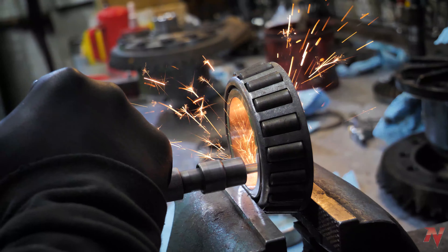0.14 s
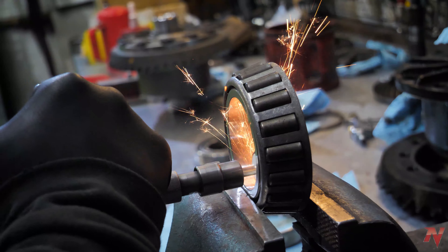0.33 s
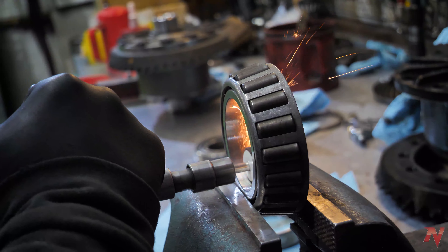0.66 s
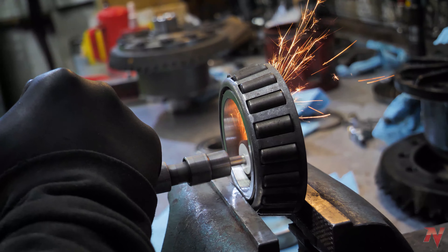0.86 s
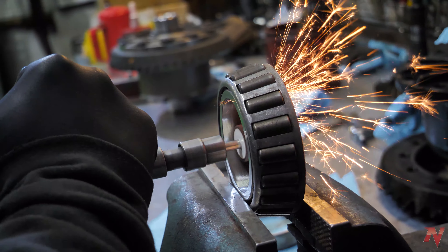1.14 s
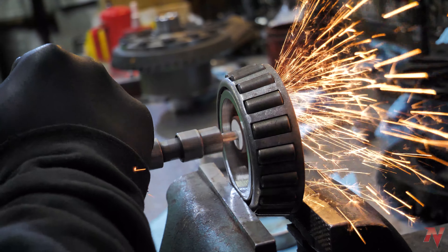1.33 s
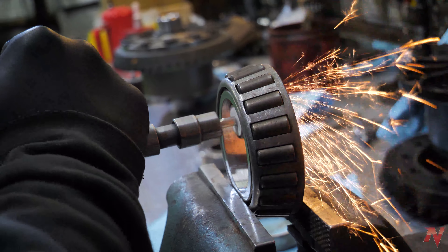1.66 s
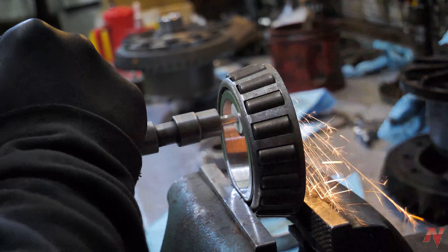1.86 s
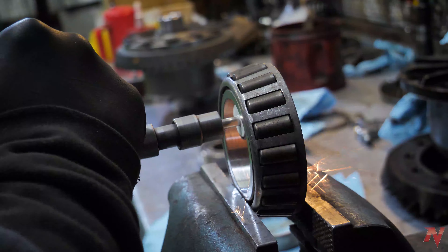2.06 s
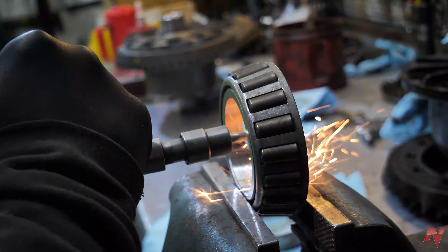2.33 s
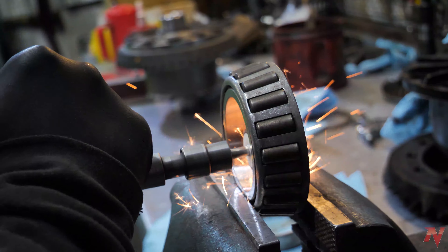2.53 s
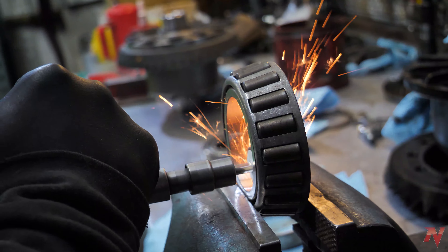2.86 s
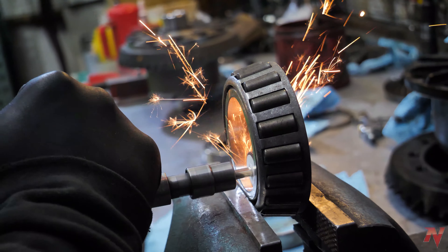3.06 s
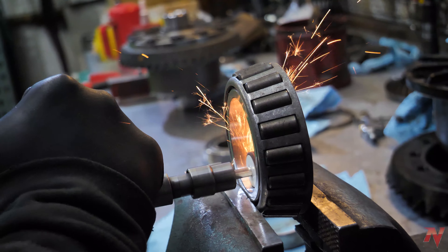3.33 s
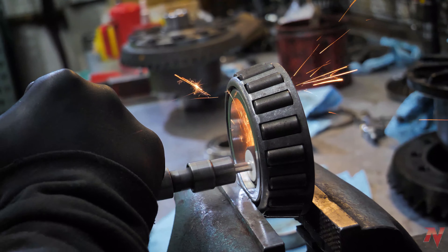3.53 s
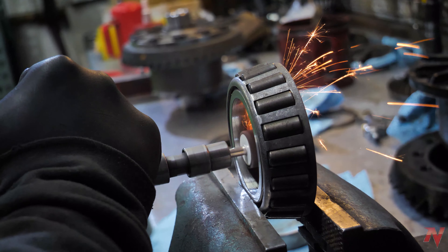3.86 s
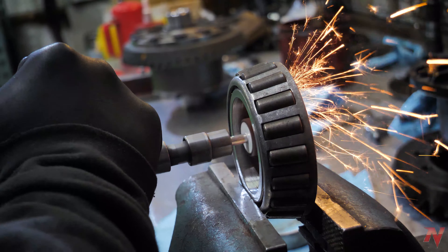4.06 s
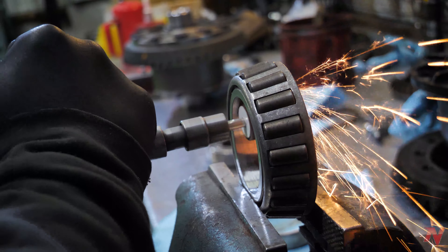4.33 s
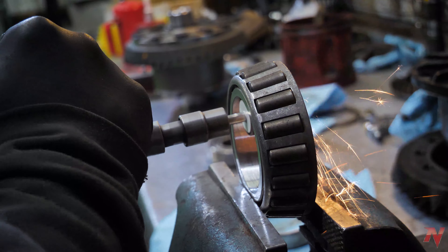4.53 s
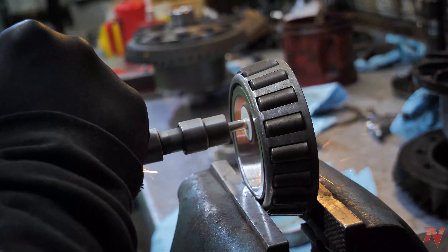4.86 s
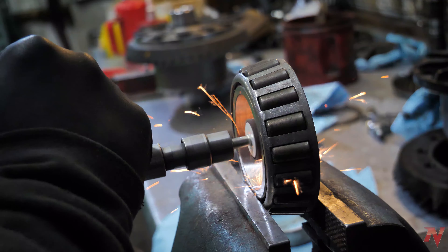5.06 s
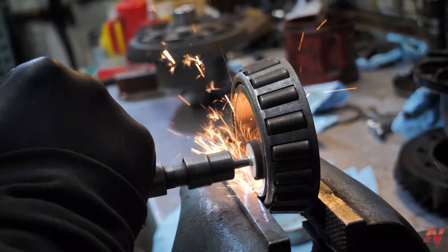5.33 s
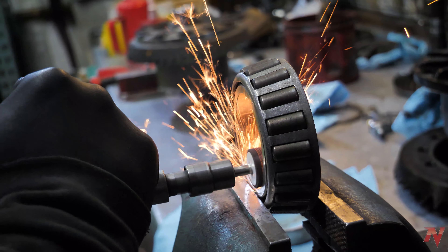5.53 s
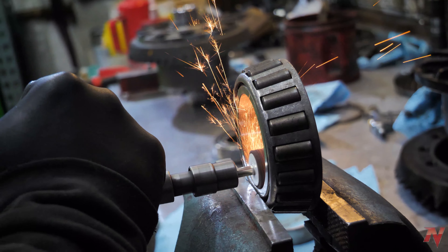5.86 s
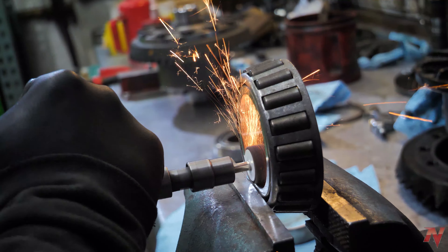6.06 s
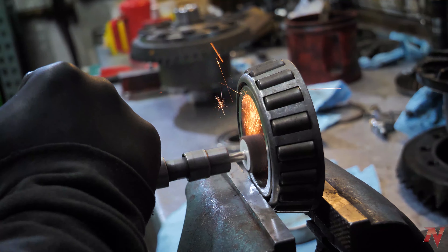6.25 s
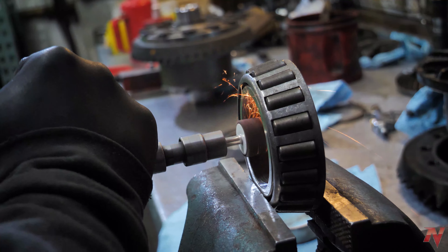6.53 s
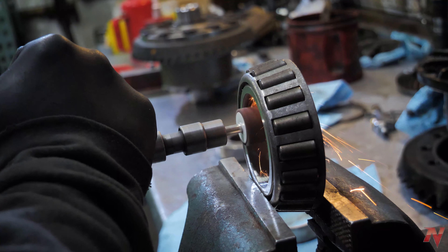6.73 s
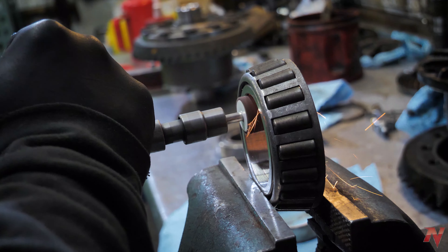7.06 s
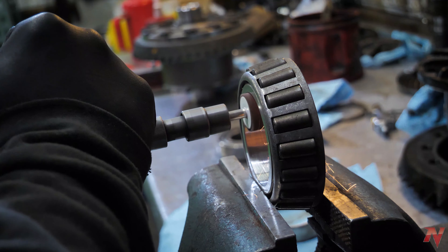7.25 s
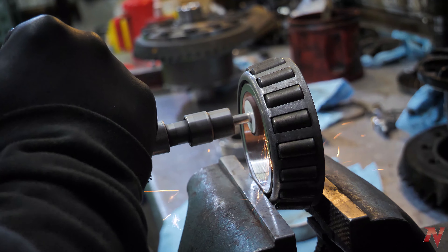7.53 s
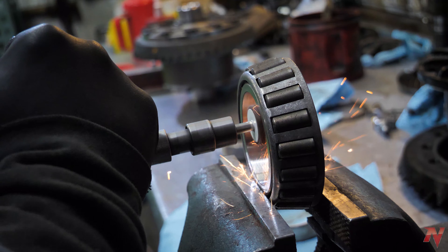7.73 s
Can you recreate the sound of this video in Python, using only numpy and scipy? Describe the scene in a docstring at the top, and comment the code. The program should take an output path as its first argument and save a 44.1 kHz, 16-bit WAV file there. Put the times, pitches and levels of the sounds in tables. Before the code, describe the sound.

A handheld die grinder runs a flap wheel around the inside of a steel bearing clamped in a vice. From the start, a gritty rasp and hiss mix with ringing metal and a motor whine that sags under pressure and rises as the hand eases. High squeals swell and fade several times as the grinding carries on without a break. It is heard close up in a small workshop, over a faint bench rumble.

```python
"""Die grinder in a bearing bore

A hand-held die grinder runs a flap wheel round the bore of a roller bearing clamped in a vice.
Periodic friction makes a harmonic comb that scrapes and squeals once a turn, while random impacts
of grit set the steel ringing and hissing. The motor whines and sags under load, and the bench
rumbles. The sound is heard close up, in mono, in a small workshop."""
import sys
import numpy as np
from scipy import signal
from scipy.fft import rfft, irfft
from scipy.io import wavfile
from scipy.ndimage import uniform_filter1d

SR = 44100
rng = np.random.default_rng(int(sys.argv[2]) if len(sys.argv) > 2 else 0)


def output_pcm(signal):
    """Save a mono or channel-first signal as 16-bit PCM at the path in sys.argv[1].

    Samples are clipped to [-1, 1] before scaling.
    """
    pcm = np.clip(np.atleast_2d(signal).T, -1, 1) * 32767
    wavfile.write(sys.argv[1], SR, np.round(pcm).astype(np.int16))


N = 348390
TIME = np.arange(N) / SR
STEPS = np.arange(0, N + 128, 128) / SR   # control times, t/s
CRUISE_HZ, CUTOFF_HZ = 210, 15750   # nominal rotation frequency; upper limit of the sound

# rotation frequency of the spindle: t/s, f/Hz
SPEED = [(0.0, 210.8), (0.16, 205.3), (0.3, 193.9), (0.38, 194.2), (0.83, 227.8), (1.21, 227.1),
         (1.32, 211.2), (1.41, 205.0), (1.54, 206.8), (1.63, 212.3), (1.8, 219.1), (1.9, 218.4),
         (1.97, 215.5), (2.18, 214.0), (2.27, 217.0), (2.38, 198.2), (2.48, 197.4), (2.63, 187.8),
         (2.76, 197.2), (2.89, 196.5), (2.96, 189.7), (3.07, 183.9), (3.14, 185.1), (3.42, 211.4),
         (3.64, 224.7), (3.84, 232.4), (3.98, 221.9), (4.03, 216.0), (4.12, 214.0), (4.33, 223.7),
         (4.63, 224.3), (4.83, 213.0), (4.93, 214.1), (5.15, 211.5), (5.3, 199.9), (5.58, 210.3),
         (5.83, 205.8), (6.0, 208.9), (6.33, 228.3), (6.43, 220.0), (6.53, 224.1), (6.72, 218.7),
         (6.86, 212.3), (6.93, 212.2), (7.17, 219.2), (7.58, 214.7), (7.75, 204.1), (7.89, 210.4)]
# how hard the wheel is pressed on the steel, as a grinding level: t/s, level/dB
PRESSURE = [(0.0, -19.5), (0.7, -20), (0.72, -25), (0.77, -21.5), (1.08, -28), (1.8, -20.5), (2.13, -27.5),
            (2.35, -26.5), (2.73, -22), (3.28, -20.5), (3.65, -21), (4.0, -31), (4.03, -26.5), (4.6, -20.5),
            (4.71, -26.5), (5.19, -26), (5.92, -20.5), (6.34, -23), (6.4, -29.5), (7.11, -23),
            (7.37, -26.5), (7.9, -26)]
# course of the treble: t/s, level/dB
TREBLE = [(0.0, -36.5), (0.88, -26), (1.47, -35), (1.82, -29), (2.07, -36.5), (3.76, -29), (4.11, -40),
          (4.66, -32), (4.75, -34), (5.83, -26.5), (6.84, -33.5), (7.11, -32.5), (7.44, -33.5), (7.9, -35)]


def wheel(angle, scrape_db=-46.5, shriek_db=-48.5, shriek_hz=12400, squeal_edge_hz=5750,
          clump_db=1.25, patchy_db=4.0, delay_turns_per_order=0.035, wander_rad=0.86):
    """Periodic friction: the same flaps rub on every turn, giving harmonics (orders) of the rotation."""
    # colour that the bore gives the tones: f/Hz, gain/dB
    bore = [(1000, -24), (2000, -9.5), (3200, 5), (4100, 3), (4800, 2.5), (5350, 2.5), (5900, 0),
            (6600, -3), (7200, -4.5), (7800, -1), (8600, -3), (9300, -1), (13000, -3), (15600, -4.5)]
    # orders that the uneven flaps favour or miss: order, gain/dB
    flaps = [(13, -1), (16, -0.5), (19, 2.5), (21, 3.5), (22, 4), (25, -3), (31, 1.5), (32, 3.5),
             (33, -3.5), (36, 4.5), (38, -1), (39, 0.5), (43, -1), (47, 0), (50, 1.5), (54, -4)]
    # orders that whistle out as the wheel is tilted: start t/s, end t/s, order, gain/dB
    whistles = [(0.45, 0.75, 46, 9), (0.75, 0.95, 29, 5), (0.82, 1.0, 27, 7), (0.905, 1.102, 31, 5),
                (0.994, 1.3, 35, 3), (1.42, 1.58, 29, 9.5), (1.95, 2.25, 36, 3.5), (3.3, 3.6, 46, 6),
                (3.65, 3.85, 29, 4.5), (3.85, 4.1, 32, 2), (4.3, 4.62, 26, 6), (4.75, 5.1, 31, 5.5),
                (4.78, 5.02, 15, 9.5), (5.51, 6.1, 38, 9.5), (6.26, 6.42, 27, 3), (6.343, 6.55, 38, 7),
                (6.5, 6.91, 32, 7.5), (6.65, 6.852, 29, 7), (7.05, 7.35, 32, 4.5)]
    rotation_hz, = in_time(SPEED, STEPS)
    pressure_db, treble_db, excess_hz = swing_db(PRESSURE), swing_db(TREBLE), overspeed_hz()
    scrape_level_db = scrape_db + pressure_db + 0.0246 * revving() + 0.0534 * excess_hz
    db_per_octave = -2.0 + 0.5 * (treble_db - pressure_db)
    squeal_gain, centre_hz, half_width_hz = squeal_band()
    squeal_gain = squeal_gain * from_db(0.46 * drift(18))   # the hand-held wheel judders
    shriek_gain = from_db(shriek_db + 1.24 * treble_db + 0.0535 * revving())
    roughness_rad = 0.46 * from_db(-0.28 * excess_hz)   # rougher under load
    unevenness = np.clip(from_db(0.1 * excess_hz), 0, 1)   # load evens out the orders
    lift_db = dict(flaps)
    for start, end, k, db in whistles:
        lift_db[k] = lift_db.get(k, 0) + db * swell(start, end, rise_s=0.094, fall_s=0.094)
    whistling = {k for _, _, k, _ in whistles}
    out, clump, within_turn = np.zeros(N), drift(3.2), angle % (2 * np.pi)
    for k in range(7, 84):
        hz = k * rotation_hz
        scrape = from_db(scrape_level_db + db_per_octave * np.log2(hz / 4000))
        squeal = squeal_gain / (1 + ((hz - centre_hz) / half_width_hz) ** 2)
        squeal = squeal / np.sqrt(1 + (squeal_edge_hz / hz) ** 24)   # steep lower edge
        shriek = shriek_gain / (1 + ((hz - shriek_hz) / 3300) ** 2)
        friction = np.sqrt(scrape ** 2 + squeal ** 2 + shriek ** 2)
        clump = .8 * clump + .6 * drift(4)   # neighbouring orders swell together
        # each also comes and goes alone: high orders more, whistling ones less
        own = drift(3) * min(k / 40, 1) * (.5 if k in whistling else 1) * unevenness
        gain = friction * from_db(at_hz(bore, hz) + lift_db.get(k, 0) + clump_db * clump + patchy_db * own)
        # group delay grows with order: an upward chirp on every turn
        phase = -np.pi * delay_turns_per_order * k * k
        phase += wander_rad * drift(3)   # the contact wanders
        phase += roughness_rad * np.hypot(scrape, shriek) / friction * drift(30)   # squeal is steadier
        out += audio_rate(gain) * np.sin(k * within_turn + audio_rate(phase), dtype=np.float32)
    return np.sqrt(2) * out


def squeal_band(idle_db=-38, idle_hz=7000, idle_half_width_hz=2100, glide_share=0.41):
    """Gain, centre and half-width of the squeal: its swells add in power; the loudest sets the band."""
    # squeals on the way up and down three laps of the bore:
    # start t/s, end t/s, level/dB, rise t/s, fall t/s, first centre f/Hz, last centre f/Hz, half-width/Hz
    squeals = [(0.808, 1.167, -29, 0.19, 0.24, 6800, 7960, 1370),
               (1.954, 2.1, -31, 0.3, 0.2, 7950, 7500, 2180),
               (3.724, 3.91, -30, 0.24, 0.33, 7000, 8200, 2200),
               (4.57, 4.685, -30.5, 0.2, 0.26, 8000, 8400, 2290),
               (4.82, 5.01, -34.5, 0.1, 0.056, 7300, 6700, 1410),
               (6.31, 6.4, -30.5, 0.1, 0.28, 7000, 8100, 2170),
               (7.253, 7.382, -30.5, 0.35, 0.35, 8540, 8170, 2090)]
    power = from_db(idle_db + 0.19 * overspeed_hz()) ** 2   # a faint squeal stays, growing with speed
    centre, width = power * idle_hz, power * idle_half_width_hz
    for start, end, level_db, rise_s, fall_s, first_hz, last_hz, half_width_hz in squeals:
        own_power = (from_db(level_db) * swell(start, end, rise_s, fall_s)) ** 2
        glide = .5 + .5 * np.tanh((STEPS - (start + end) / 2) / (glide_share * (end - start)))
        power += own_power
        centre += own_power * (first_hz + glide * (last_hz - first_hz))
        width += own_power * half_width_hz
    return np.sqrt(power), centre / power, width / power


def grit(angle, throb=0.13, grain_db=3.0, flicker_db=0.5):
    """Random excitation: uneven grains cut the steel, hardest once a turn, and drive its resonances."""
    # spectrum of the cutting noise: f/Hz, relative level/dB
    colour = [(100, -31.5), (250, -21), (450, -20), (700, -16.5), (1150, -14.5), (2000, -11), (2900, -9),
              (3400, -5.5), (4100, -5), (4800, -5), (6000, -10), (8000, -10.5), (9500, -20), (13000, -16.5),
              (15700, -15.5)]
    # resonances of bearing and vice: f/Hz, width/Hz, gain/dB
    resonances = [(1562, 170, 7), (1916, 49, 7), (2249, 79, 9), (2381, 79, 9.5), (2581, 51, 11.5),
                  (2763, 105, 7.5), (3056, 85, 8.5), (3202, 77, 10.5), (3394, 71, 6), (3640, 76, 6.5),
                  (3820, 70, 0.5), (4130, 56, -14)]
    # ring, rasp and hiss: level/dB, dB per dB of pressure, dB per dB of treble, loss with speed/(dB/Hz)
    bands = [(-26, 0.61, 0.0, -0.0337), (-28.5, 0.84, -0.1, 0.0523), (-33, 0.5, -0.1, -0.0436)]
    edges_hz = [20, 4000, 8500, CUTOFF_HZ]
    grains = rng.standard_normal(N) * from_db(grain_db * rng.standard_normal(N))
    grains *= 1 + throb * np.cos(angle)
    hz = np.arange(N // 2 + 1) * SR / N
    steel_db = sum(db / (1 + (2 * (hz - f) / width) ** 2) for f, width, db in resonances)
    spectrum = rfft(grains) * from_db(at_hz(colour, hz) + steel_db)
    out = np.zeros(N)
    for low, high, (base_db, by_pressure, by_treble, loss) in zip(edges_hz, edges_hz[1:], bands):
        band = rms_one(irfft(spectrum * ((hz >= low) & (hz < high)), N))
        level_db = base_db + by_pressure * swing_db(PRESSURE) + by_treble * swing_db(TREBLE)
        level_db -= loss * overspeed_hz() + noise_thinning_db()
        out += band * audio_rate(from_db(level_db + flicker_db * drift(39)))
    return out


def motor(angle, waver_db=1.0, flutter_db=1.0, shake_rad=0.086):
    """Rotational harmonics: four pulses a turn make the whine, and imbalance adds a weak hum."""
    # whine: order, level/dB, share of the whine's swing, loss with speed/(dB/Hz)
    whine = [(4, -38.5, 1.18, 0.0), (8, -44.5, 0.78, 0.13), (12, -37, 0.45, 0.2525)]
    # course of the whine: t/s, level/dB
    whine_level = [(0.0, -34.5), (0.51, -32), (0.86, -43.5), (1.56, -37.5), (2.27, -42.5), (2.35, -36),
                   (2.62, -42), (2.84, -32), (3.04, -41.5), (3.37, -33), (3.61, -39.5), (4.64, -42),
                   (5.44, -32), (6.31, -37.5), (6.42, -47.5), (6.89, -37), (7.39, -41.5), (7.9, -34)]
    # hum: order, level/dB at the lowest speed, loss with speed/(dB/Hz), dB per dB of pressure
    imbalance = [(1, -52.5, 0.5, 0.54), (2, -54, 0.5, 0.5), (3, -58.5, 0, 0.5), (5, -66, 0.5, 3.5),
                 (6, -55, 0, -0.5), (7, -55, -0.2, 0)]
    out, excess_hz = np.zeros(N), overspeed_hz()
    for k, (order, level_db, share, loss) in enumerate(whine, 1):
        steady_db = level_db + share * swing_db(whine_level) - loss * excess_hz
        gain = from_db(steady_db + waver_db * drift(5) + flutter_db * k * drift(32))
        jitter = shake_rad * (k - 1) ** 2 * drift(32)   # only the overtones shake in phase
        out += audio_rate(gain) * np.sin(order * angle + audio_rate(jitter))
    for order, level_db, loss, by_pressure in imbalance:
        steady_db = level_db - loss * (excess_hz - excess_hz.min()) + by_pressure * swing_db(PRESSURE)
        gain = from_db(steady_db + 3.0 * drift(4.8))
        out += audio_rate(gain) * np.sin(order * angle + rng.uniform(0, 2 * np.pi))
    return np.sqrt(2) * out


def bearing_ring(ring_hz=3450, width_hz=480, level_db=-35.0):
    """Forced resonance: the bearing's main mode swells steeply as pressure rises and the spindle sags."""
    r = np.exp(-np.pi * width_hz / SR)
    b, a = [1, 0, -0.75], [1, -2 * r * np.cos(2 * np.pi * ring_hz / SR), r * r]
    ringing = signal.lfilter(b, a, signal.lfilter(b, a, rng.standard_normal(N)))
    bite_db = 1.54 * swing_db(PRESSURE) - 0.19 * overspeed_hz()
    return rms_one(ringing) * audio_rate(from_db(level_db + bite_db))


def rumble(level_db=-58):
    """Structure-borne noise: bench and vice rumble more as the wheel bites and the spindle sags."""
    # spectrum of bench and vice: f/Hz, relative level/dB
    colour = [(20, 1.5), (40, -7), (80, -1.5), (140, -10), (300, -14), (1000, -25)]
    hz = np.arange(N // 2 + 1) * SR / N
    noise = irfft(rfft(rng.standard_normal(N)) * from_db(at_hz(colour, hz)) * (hz < 1000), N)
    bite_db = 0.5 * swing_db(PRESSURE) - 0.03 * overspeed_hz()
    gain = from_db(level_db + bite_db - noise_thinning_db() + 0.52 * drift(3))
    return rms_one(noise) * audio_rate(gain)


def workshop(x, room_db=-17, t60_s=0.25):
    """Reverberation: diffuse reflections from bench and walls decay exponentially."""
    t = TIME[:SR // 2]
    tail = rng.standard_normal(len(t)) * from_db(-60 * t / t60_s) * (t > .004)
    return from_db(room_db) * signal.fftconvolve(x, tail / np.sqrt(np.sum(tail ** 2)))[:N]


def spindle(flutter=0.00067):
    """Angle as the integral of rotation speed, which trembles with the bite of the wheel."""
    rotation_hz, = in_time(SPEED, TIME)
    return 2 * np.pi * np.cumsum(rotation_hz * (1 + flutter * audio_rate(drift(25)))) / SR


def overspeed_hz():
    """Rotation frequency above cruise; negative when load slows the spindle."""
    return in_time(SPEED, STEPS)[0] - CRUISE_HZ


def revving(window_s=0.59):
    """Smoothed positive acceleration of the spindle as the hand eases off, in Hz/s."""
    acceleration = np.gradient(overspeed_hz(), STEPS)
    return uniform_filter1d(np.maximum(acceleration, 0), round(window_s / STEPS[1]))


def noise_thinning_db(max_loss_db=2.5):
    """Grit and rumble get this much quieter while the squeal is loud."""
    squeal_gain = squeal_band()[0]
    return max_loss_db * squeal_gain / squeal_gain.max()


def swing_db(curve):
    """A level curve at the control times, relative to its mean."""
    level_db, = in_time(curve, STEPS)
    return level_db - level_db.mean()


def swell(start, end, rise_s, fall_s):
    """Exponential rise, hold at 1 from start to end, exponential decay."""
    return np.exp(-np.maximum(start - STEPS, 0) / rise_s - np.maximum(STEPS - end, 0) / fall_s)


def drift(corner_hz):
    """Random fluctuation: low-passed noise of unit rms at the control times."""
    r = np.exp(-2 * np.pi * corner_hz * STEPS[1])
    noise = rng.standard_normal(2 * len(STEPS))
    return rms_one(signal.lfilter([1], [1, -2 * r, r * r], noise)[len(STEPS):])


def audio_rate(control):
    """Linear interpolation from the control times to every sample."""
    control = control.astype(np.float32)
    ramp = np.linspace(0, 1, round(STEPS[1] * SR), endpoint=False, dtype=np.float32)
    return (control[:-1, None] + np.diff(control)[:, None] * ramp).ravel()[:N]


def in_time(rows, at):
    """The columns of a curve table, interpolated at the given times."""
    t, *columns = np.transpose(rows)
    return [np.interp(at, t, column) for column in columns]


def at_hz(points, hz):
    """A spectrum table interpolated on a log-frequency axis."""
    f, db = np.transpose(points)
    return np.interp(np.log(hz + 1e-9), np.log(f), db)


def from_db(db):
    """Decibels to amplitude ratio."""
    return 10 ** (np.asarray(db) / 20)


def rms_one(x):
    """Normalisation to unit rms."""
    return x / np.sqrt(np.mean(x ** 2) + 1e-20)


def scene():
    """Superposition: one spindle drives motor, wheel and grit; both channels carry the same sum."""
    angle = spindle()
    tool = motor(angle) + wheel(angle) + grit(angle) + bearing_ring()
    return np.tile(tool + workshop(tool) + rumble(), (2, 1))


def record(dry):
    """Band limiting: an elliptic low-pass cuts the top steeply."""
    return signal.sosfilt(signal.ellip(12, .1, 90, CUTOFF_HZ, fs=SR, output="sos"), dry)


dry = scene()
out = record(dry)
output_pcm(out)
```